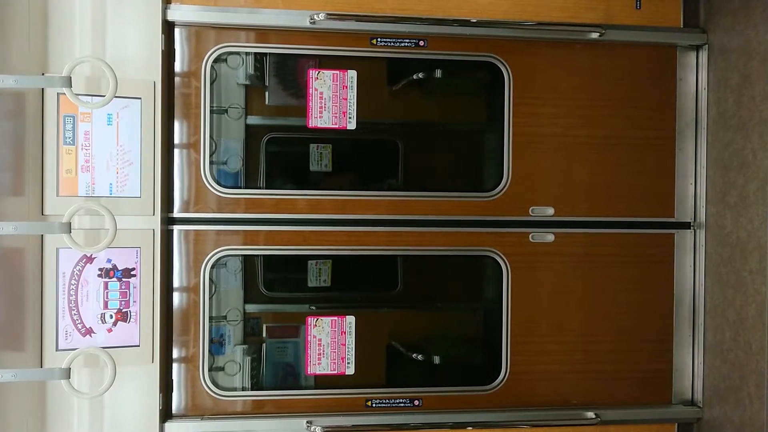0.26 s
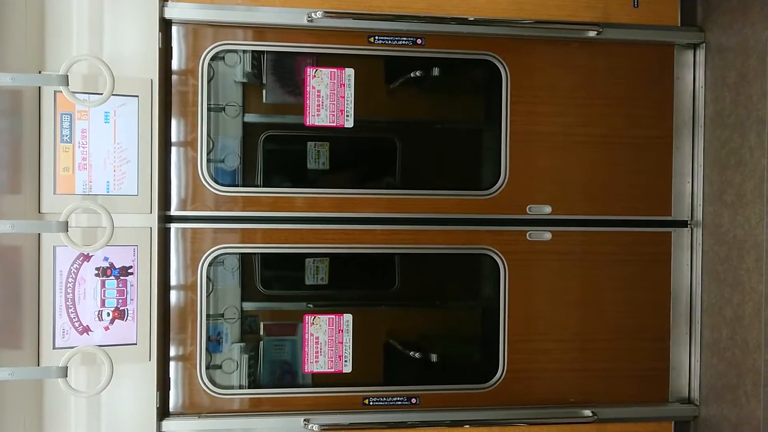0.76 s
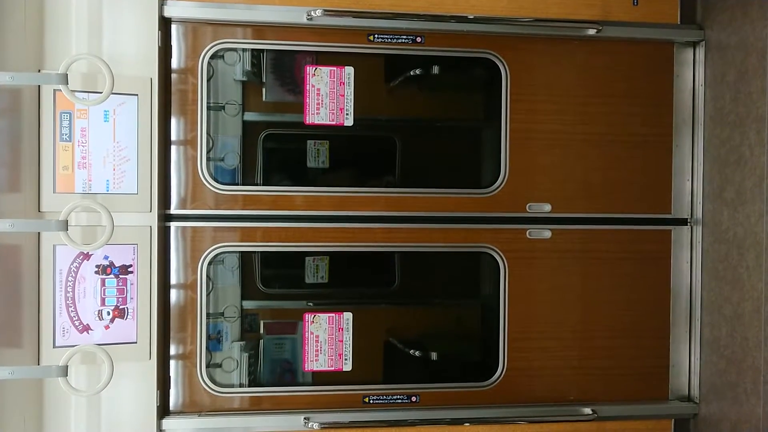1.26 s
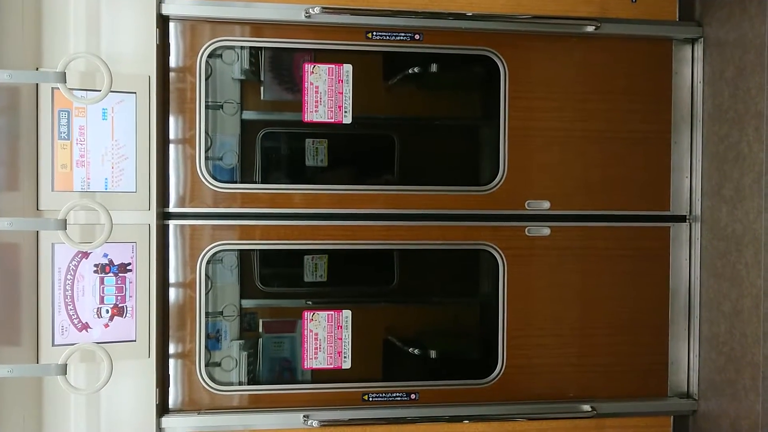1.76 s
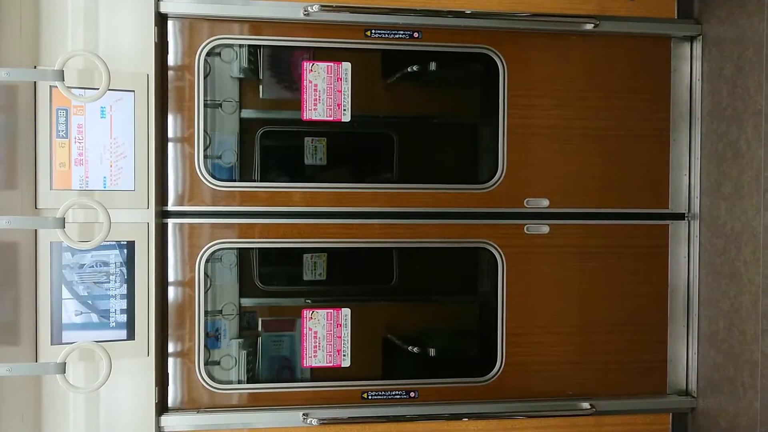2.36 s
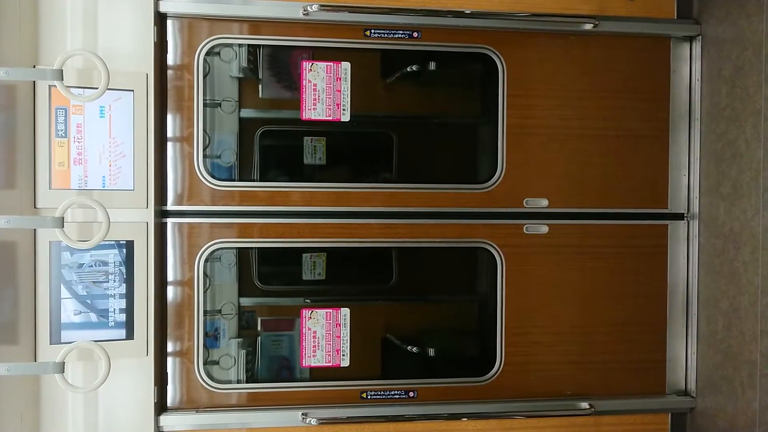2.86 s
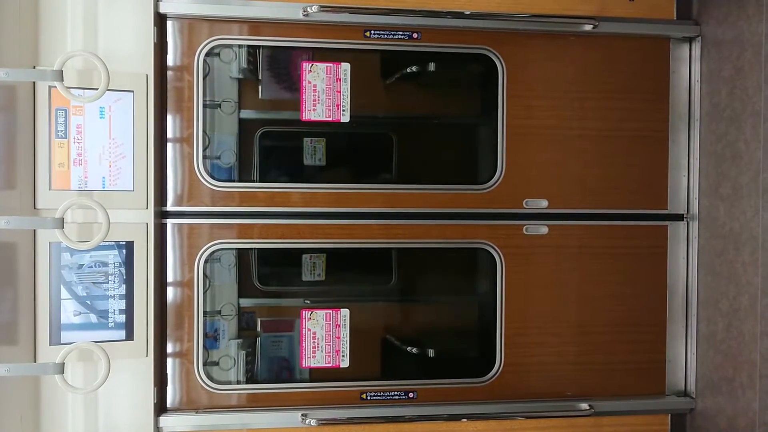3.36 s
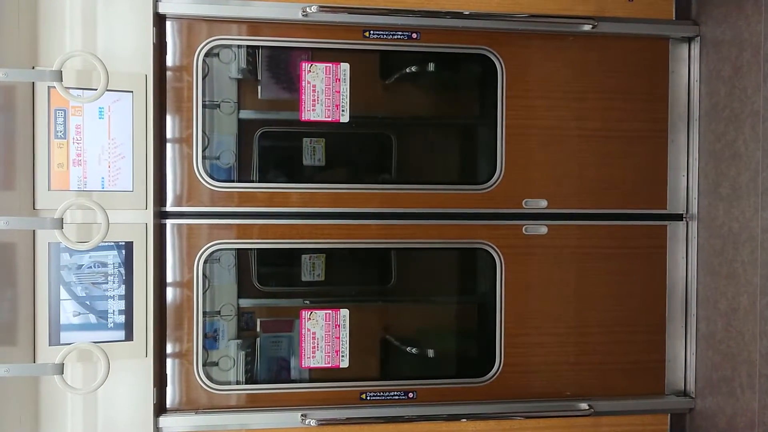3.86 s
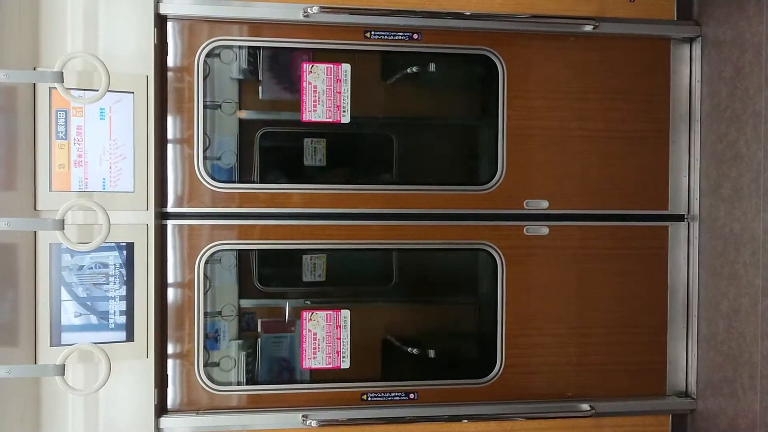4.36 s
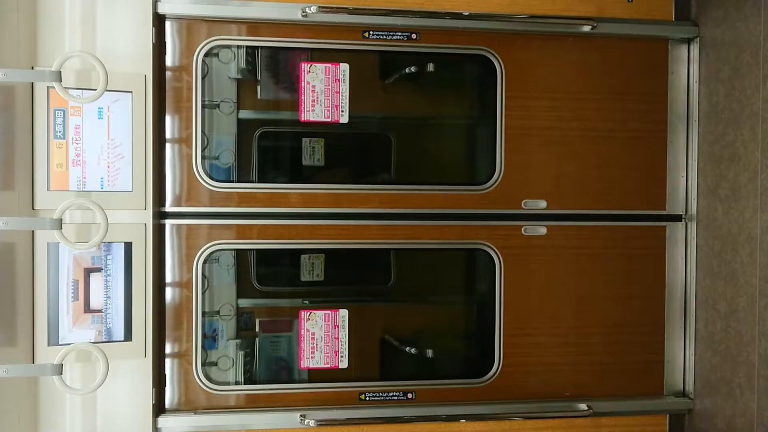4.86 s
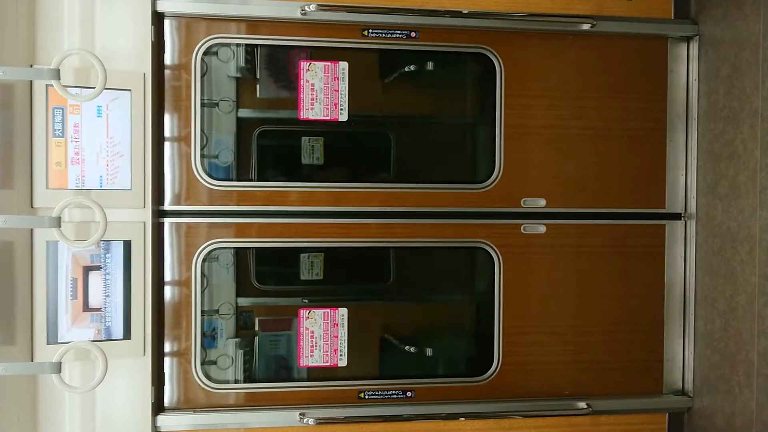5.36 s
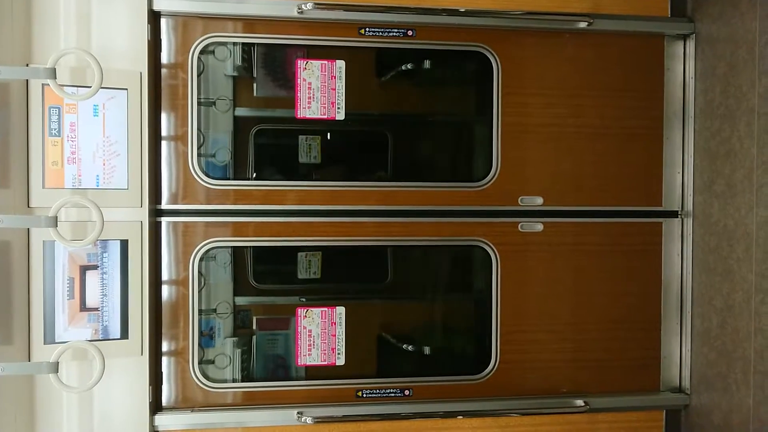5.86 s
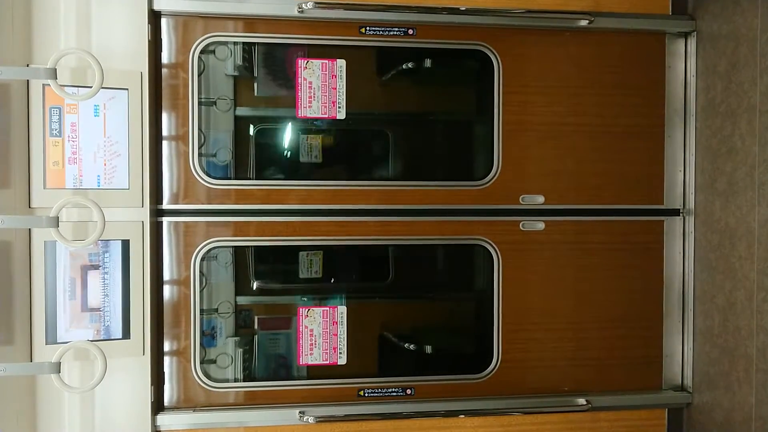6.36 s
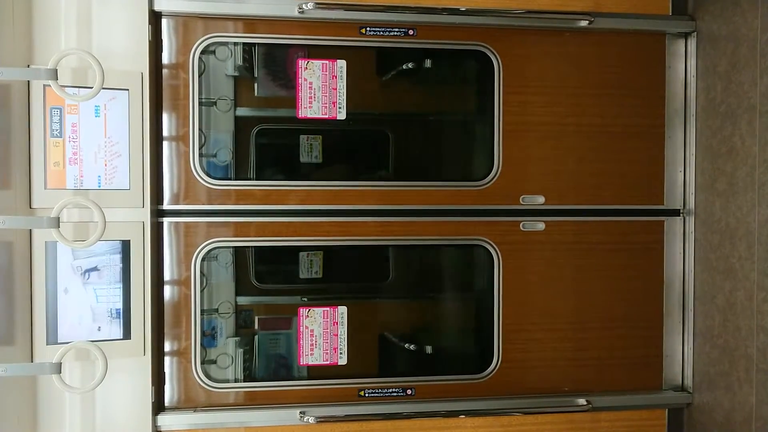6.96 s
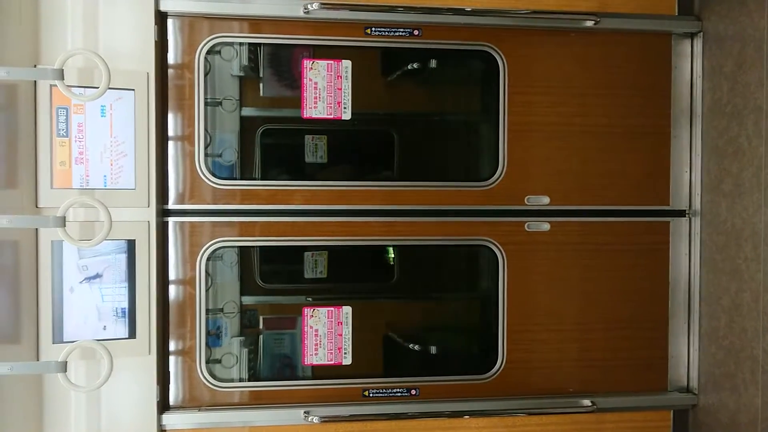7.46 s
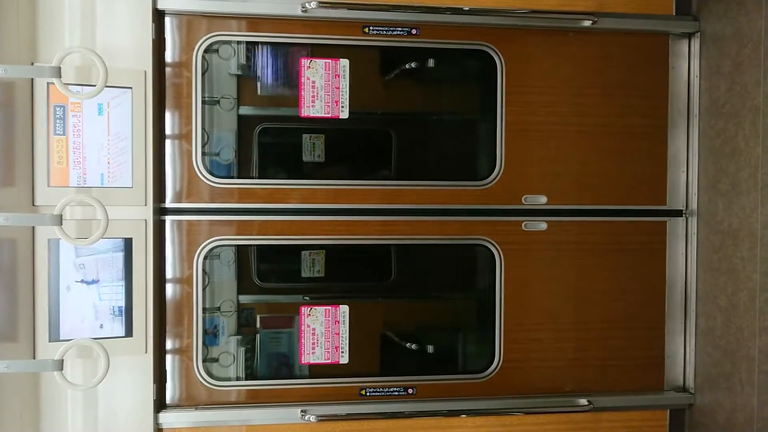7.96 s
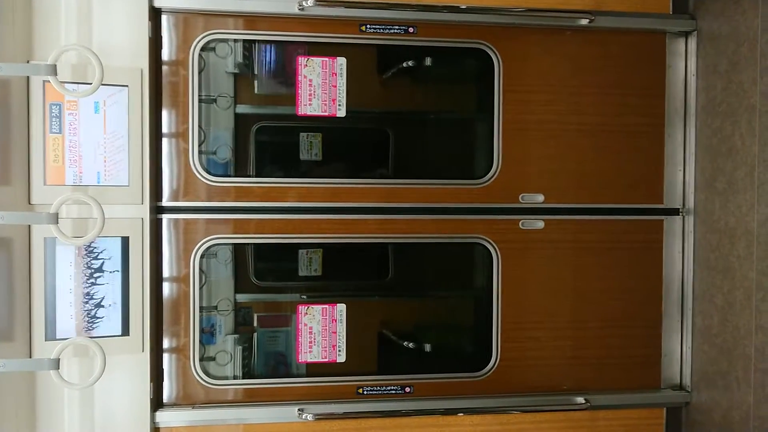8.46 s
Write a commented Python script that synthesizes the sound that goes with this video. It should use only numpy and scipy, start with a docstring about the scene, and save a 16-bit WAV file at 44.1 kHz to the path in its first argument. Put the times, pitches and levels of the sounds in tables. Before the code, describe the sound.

Inside a train car, a deep boom near 60 Hz, floor drone, midrange roar and soft hiss run continuously in wide stereo. A wheel thump lands at the start; a faint fuzzy brake whine sinks from about 1020 to 920 Hz, fading by 1.9 s amid a gentle hiss swell. Knocks with short, rattling metallic tails come at 0.8-1.0, 1.3-1.5 and 1.8-1.9 s; a tick and fitting buzz join near 1.7. The roar dips from 2 to 4 s, with knocks at 2.8-3.5 and a sharp tick at 3.2. Faint wheel ringing follows the whine. Strong, crowded knocks fill 4-6.4 s, with heavy lurches at 4.3 and 6.1. Roar surges around 5.2 and again after 6. Thin right-side crackle and sizzle swell from 5.6 to 7.4, then thin out. A left-leaning tick and softer knocks come around 8, with a weak last knock at 8.6.

```python
"""The car body booms over the roar, floor drone and hiss of a running train, heard from inside a car.
These are shaped noise beds that follow the rail roughness; boom and drone also follow the rail joints.
Wheels knock over the joints, mostly in pairs: decaying sines thump and a noise burst clatters.
A fuzzy resonant brake whine sinks and fades at the start; then the wheels ring faintly as noise resonances.
Noise ticks, sine lurches and buzzing fittings come singly; late on, faint dense snaps crackle at right
over a fine sizzle."""
import sys
import numpy as np
from scipy import signal
from scipy.fft import rfft, irfft, next_fast_len
from scipy.io import wavfile
from scipy.ndimage import uniform_filter1d

SR = 44100
rng = np.random.default_rng(int(sys.argv[2]) if len(sys.argv) > 2 else 0)


def to_wav(s):
    """Save 16-bit WAV."""
    ch = np.atleast_2d(s).T  # columns
    pcm = np.round(np.clip(ch, -1, 1) * 32767)  # PCM
    wavfile.write(sys.argv[1], SR, pcm.astype(np.int16))


N = 383669


def gain_of(db):
    """Turns decibels into an amplitude factor."""
    return 10 ** (np.asarray(db) / 20)


def evened(x):
    """Scales to rms 1."""
    return x / np.sqrt(np.mean(x ** 2) + 1e-20)


def read(points, hz):
    """Reads a table on a log-frequency axis."""
    f, value = np.transpose(points)
    return np.interp(np.log(hz + 1), np.log(f + 1), value)


def follow(rows):
    """Draws the columns of a curve table sample by sample."""
    s, *columns = np.transpose(rows)
    return [np.interp(np.arange(N) / SR, s, column) for column in columns]


def add(mix, s, sound):
    """Mixes a stereo sound in at time s, which may lie before the start."""
    at = round(s * SR)
    sound = sound[:, max(-at, 0):]
    part = mix[:, max(at, 0):][:, :sound.shape[1]]
    part += sound[:, :part.shape[1]]


def colour(x, shape):
    """Filters by a spectrum table."""
    size = next_fast_len(x.shape[-1])
    gains = gain_of(read(shape, np.fft.rfftfreq(size, 1 / SR)))
    return irfft(rfft(x, size) * gains, size)[..., :x.shape[-1]]


# likeness of left and right: f/Hz, correlation
LIKENESS = [(60, 0.99), (110, 0.98), (220, 0.96), (410, 0.73), (790, 0.53), (1500, 0.093), (2860, -0.1),
            (5440, 0.085)]
# stereo lean: f/Hz, left over right level/dB
STEREO_LEAN = [(60, 2), (110, 2), (270, -2), (730, 1), (1210, -2), (2000, -3), (3300, -6), (5400, 5),
               (8500, 8.5), (12000, -3.5)]
LEFT_LEAD_S = 0.00016  # the left microphone hears the car first


def diffuse(size):
    """Spectrum of a diffuse field at two microphones: alike in the bass, unrelated in the treble."""
    hz = np.fft.rfftfreq(size, 1 / SR)
    left, other = rfft(rng.standard_normal((2, size)))
    same = np.clip(read(LIKENESS, hz), -1, 1)
    right = same * left + np.sqrt(1 - same ** 2) * other
    right = right * np.exp(-2j * np.pi * hz * LEFT_LEAD_S)
    lean = gain_of(read(STEREO_LEAN, hz) / 2)
    return hz, np.array([left * lean, right / lean])


def wash(shape):
    """Diffuse noise of a given spectrum, rms 1."""
    size = next_fast_len(N)
    hz, z = diffuse(size)
    return evened(irfft(z * gain_of(read(shape, hz)), size)[:, :N])


def steadied(x, span_s):
    """Evens out swells slower than span_s, bringing the level close to rms 1."""
    size = max(int(span_s * SR), 2)
    power = uniform_filter1d(uniform_filter1d((x ** 2).mean(0), size), size)
    return x / np.sqrt(abs(power) + 1e-9)


def resonate(x, hz, width):
    """A steep two-pole resonance that follows the pitch hz, rms 1."""
    turn = np.exp(2j * np.pi * np.cumsum(hz * np.ones(N)) / SR)
    r = np.exp(-np.pi * width * np.sqrt(2) / SR)
    # shift the pitch down to zero, low-pass, shift back up
    around_zero = signal.lfilter([1], [1, -2 * r, r * r], x / turn)
    return evened((turn * around_zero).real)


def waver(top_hz=9):
    """Slow irregular wavering from 2 Hz to top_hz, rms 1."""
    t = np.arange(0, N, 2 ** 8) / SR
    slow = sum(np.sin(2 * np.pi * (f * t + rng.random())) for f in np.geomspace(2, top_hz, 20))
    return evened(np.interp(np.arange(N) / SR, t, slow))


# single wheels over rail joints, before the trims in joints():
# t/s, thump level/dB, middle clang level/dB, high clatter level/dB
WHEEL_BLOWS = [(-0.015, -14.5, -34, -44.5), (0.79, -16, -33.5, -48), (0.96, -20.5, -36, -48.5),
               (1.308, -24, -40, -50.5), (1.481, -27, -46, -55), (1.776, -20.5, -39.5, -52),
               (1.941, -19, -35.5, -50), (2.804, -19, -39.5, -53), (2.981, -20.5, -39.5, -54),
               (3.131, -24, -36, -45.5), (3.295, -20.5, -32.5, -46), (3.519, -29, -54, -61),
               (3.989, -16.5, -31.5, -42), (4.155, -13, -29, -40.5), (4.334, -23.5, -35.5, -48.5),
               (4.713, -25.5, -43, -51.5), (4.816, -19.5, -43.5, -48), (4.978, -19, -36.5, -50),
               (5.031, -14, -29.5, -42.5), (5.211, -16, -32.5, -43.5), (5.577, -22, -37, -47.5),
               (5.761, -25.5, -42, -52), (5.865, -18, -37.5, -51), (6.052, -19.5, -39.5, -53),
               (6.41, -26.5, -46, -58), (7.91, -25.5, -46.5, -59), (8.092, -27, -43.5, -58),
               (8.629, -31, -47, -61)]
SHAKE_RISE_S, SHAKE_T60_S = 0.035, 1.38


def shaking():
    """Each wheel's thump feeds the car body, which swings up quickly and settles slowly."""
    power, t = np.zeros(N), np.arange(N) / SR
    for s, thump_db, _, _ in WHEEL_BLOWS:
        age = np.maximum(t - s, 0)
        swing = (1 - np.exp(-age / SHAKE_RISE_S)) * gain_of(thump_db - 60 * age / SHAKE_T60_S)
        power += swing ** 2
    return np.sqrt(power)


# rail roughness under the wheels: t/s, level/dB
ROUGHNESS = [(0, 0), (1.8, -3), (2.25, -5.5), (3.9, -6), (4.7, -0.5), (5.15, 5), (5.55, -4), (6.05, 6.5),
             (6.55, 3), (7.2, 6.5), (7.8, 1.5), (8.3, 0.5), (8.7, 4)]
# spectra of the four running beds: f/Hz, relative level/dB
BOOM_SPECTRUM = [(12, -42), (24, -64), (33, -56), (45, -1), (55, -9.5), (62, 8), (69, 0.5), (90, -8),
                 (107, 0.5), (122, -6.5), (160, -26), (260, -41), (1000, -110)]
DRONE_SPECTRUM = [(30, -76), (80, -24), (135, -1.5), (185, 3.5), (225, -0.5), (290, -1), (350, -8),
                  (440, -9), (700, -60), (3000, -100)]
ROAR_SPECTRUM = [(60, -49), (230, 4), (400, 4.5), (540, 4), (650, -1.5), (880, -0.5), (1100, -6),
                 (1500, -13), (2500, -77), (8000, -91)]
HISS_SPECTRUM = [(600, 9.5), (1300, 7), (1530, 3), (2000, 8.5), (2550, 1), (3200, 2), (3800, 2.5),
                 (4400, -3.5), (5400, -5.5), (6400, -21), (7500, -15.5), (9500, -23), (11000, -15.5),
                 (11800, -42), (15000, -37)]
# response to the track: level/dB at 0 dB roughness, gain per roughness (dB/dB), shaking over thump level/dB
BOOM_RESPONSE = (-32.5, 0.26, -10.5)
DRONE_RESPONSE = (-41, 0.46, -19.5)
ROAR_DB, HISS_DB, HISS_PER_DB = -46.5, -52, 0.21  # at 0 dB roughness; dB per dB of roughness


def running(uneven_db=1.04, sway_db=1.5):
    """Rough rails roar and hiss; they and the joints make the car body boom and the floor drone."""
    rough_db, = follow(ROUGHNESS)
    shake = shaking()

    def level(response):
        """Adds the powers of rolling and joint shaking."""
        db, slope, shake_db = response
        return np.hypot(gain_of(db + slope * rough_db), gain_of(shake_db) * shake)

    boom = level(BOOM_RESPONSE) * gain_of(sway_db * waver()) * steadied(wash(BOOM_SPECTRUM), span_s=0.17)
    drone = level(DRONE_RESPONSE) * steadied(wash(DRONE_SPECTRUM), span_s=0.14)
    roar = gain_of(ROAR_DB + rough_db + uneven_db * waver()) * wash(ROAR_SPECTRUM)
    hiss = gain_of(HISS_DB + HISS_PER_DB * rough_db) * wash(HISS_SPECTRUM)
    return boom + drone + roar + hiss


# brake tones: pitch ratio, width/Hz, relative level/dB
BRAKE_TONES = [(1.0, 21.7, 0.5), (1.311, 24, -8.5)]
# hiss around the whine: f/Hz, relative level/dB
WHINE_HISS_SPECTRUM = [(600, 7.5), (1200, 13), (1800, -5), (2500, 5.5), (3500, 5.5), (4400, -6.5),
                       (5400, -6), (6400, -14.5), (11000, -16.5), (12500, -31), (15000, -35)]
WHINE_FROM_HZ, WHINE_TO_HZ, WHINE_SINK_S = 1020, 917, 0.74  # the pitch sinks ever more slowly
WHINE_SAG_DB_PER_S, WHINE_END_S, WHINE_RELEASE_S = 3, 1.94, 0.64
WHINE_HISS_DB, WHINE_HISS_PEAK_S, WHINE_HISS_SPREAD_S = -49.5, 0.79, 0.91


def whine(level_db=-47, high_db=-57, high_ratio=2.41, high_width_hz=52):
    """Fuzzy brake tones sink and fade as the train slows; a high tone and a hiss swell and ebb."""
    t = np.arange(N) / SR
    hz = WHINE_TO_HZ + (WHINE_FROM_HZ - WHINE_TO_HZ) * np.exp(-t / WHINE_SINK_S)
    release = np.clip((WHINE_END_S - t) / WHINE_RELEASE_S, 0, 1)
    level = gain_of(level_db - WHINE_SAG_DB_PER_S * t) * release
    swell = np.exp(-((t - WHINE_HISS_PEAK_S) / WHINE_HISS_SPREAD_S) ** 2)
    noise = irfft(diffuse(N)[1], N)
    main = sum(gain_of(db) * steadied(resonate(noise, hz * ratio, width), span_s=0.022)
               for ratio, width, db in BRAKE_TONES)
    high = gain_of(high_db) * steadied(resonate(noise, hz * high_ratio, high_width_hz), span_s=0.044)
    hiss = gain_of(WHINE_HISS_DB) * wash(WHINE_HISS_SPECTRUM)
    return level * main + swell * (high + hiss)


# floor and bogie modes that a blow rings: f/Hz, relative level/dB, t60/s
BOGIE_MODES = [(118, -12, 0.21), (139.7, -9.5, 0.31), (187.1, 5.5, 0.23), (247.2, -0.5, 0.47),
               (276.6, 4.5, 0.12), (308, -9.5, 0.058), (330.6, -3, 0.28), (440, -10, 0.048)]


def thump(t, bounce_s=0.014, bounce=0.59, touch=0.68):
    """The wheel clips the rail end, lands on it and bounces; each blow rings the bogie. Peak 1."""
    out = np.zeros(len(t))
    for k, strength in enumerate([touch, 1, bounce, bounce ** 2]):
        age = np.maximum(t - k * bounce_s * rng.uniform(0.7504, 1.25), 0)
        for hz, db, t60 in BOGIE_MODES:
            amplitude = strength * rng.choice([-1, 1]) * gain_of(db - 60 * age / t60)
            out += amplitude * np.sin(2 * np.pi * hz * rng.uniform(0.97, 1.02) * age)
    return out / abs(out).max()


def chatter(t, gap_s=0.0204, depth=0.26, surge_s=0.0022, contact_s=0.00085, count=4):
    """The wheel lands within a short contact time and strikes again a few times: surges in the knock."""
    strikes_s = gap_s * np.cumsum(rng.uniform(0.62, 1.36, count))[:, None]
    ages = np.maximum(t - strikes_s, 0) / surge_s
    surges = ages ** 2 * np.exp(-ages) * 2 / np.sqrt(1 + np.arange(count))[:, None]
    landing = 1 - np.exp(-(t / contact_s) ** 2)
    return landing * (1 + depth * surges.sum(0))


# knock spectrum before the zone trims: f/Hz, relative level/dB
KNOCK_SPECTRUM = [(50, -14), (90, 0.5), (140, -2), (200, -0.5), (330, -4), (620, -18), (900, -18.5),
                  (1500, -26), (2600, -30), (3300, -28), (4200, -31.5), (5300, -36), (6500, -46),
                  (10500, -49), (13000, -61), (15000, -96)]
# build-up of the knock: f/Hz, time constant/s
KNOCK_BUILD_UP = [(150, 0.0031), (400, 0.017), (1000, 0.005), (3000, 0.024), (9000, 0.07)]
# decay of the knock after its hold: f/Hz, t60/s
KNOCK_DECAY = [(100, 1), (300, 0.51), (900, 0.49), (3000, 0.68), (9000, 0.5)]
# wall and door resonances: f/Hz, width/Hz, lift level/dB
PANEL_MODES = [(700, 60, 0), (859, 21, 4.5), (1415, 31, 2.5), (2220, 340, 3.5), (2890, 110, 4.5)]


def clatter(t, levels_db, hold_s=0.043, direct=0.3):
    """Part of the knock arrives at once; the rest builds up in panels and cabin and dies away."""
    hz, z = diffuse(len(t))
    ringing_db = sum(db / (1 + (2 * (hz - f) / width) ** 2) for f, width, db in PANEL_MODES)
    shape = gain_of(read(KNOCK_SPECTRUM, hz) + ringing_db)
    # each blow has its own strength in the low, middle and high zone
    trims = []
    for (lo, hi), db in zip([(150, 450), (500, 1500), (2000, 6000)], levels_db):
        own_db = 10 * np.log10(np.sum(shape[(hz > lo) & (hz < hi)] ** 2) / len(hz))
        trims.append((np.sqrt(lo * hi), db - own_db))
    z = z * shape * gain_of(read(trims, hz))
    # overlapping octave bands build up and die away at their own pace
    centres = np.geomspace(100, 12800, 8)
    out = np.zeros((2, len(t)))
    for centre, share in zip(centres, np.eye(len(centres))):
        band = irfft(z * np.interp(np.log(hz + 1), np.log(centres), share), len(t))
        rise = 1 - (1 - direct) * np.exp(-t / read(KNOCK_BUILD_UP, centre))
        decay = gain_of(-60 * np.maximum(t - hold_s, 0) / read(KNOCK_DECAY, centre))
        out += band * rise * decay
    return out


def joints(body_db=-12.0, clang_db=-0.5, clatter_db=3.5):
    """Every wheel that crosses a joint gives a thump and its clatter."""
    out, t = np.zeros((2, N)), np.arange(2 ** 15) / SR
    for s, low, mid, high in WHEEL_BLOWS:
        zone_levels_db = (low + body_db, mid + clang_db, high + clatter_db)
        knock = chatter(t) * clatter(t, zone_levels_db)
        add(out, s, gain_of(low) * thump(t) + knock)
    return out


# single ticks: t/s, peak level/dB, left over right level/dB
TICK_EVENTS = [(0.2848, -55, 6), (1.6214, -48, 7), (1.7355, -41, 7), (3.2114, -36, 3.5), (3.7814, -51, 2.5),
               (7.912, -36, 10)]
# tick spectrum: f/Hz, relative level/dB
TICK_SPECTRUM = [(2000, -14), (4700, 8), (8000, 1), (11000, -4), (15000, -4)]


def ticks(decay_s=0.0011):
    """Small dry ticks close to the microphones: coloured noise that dies within milliseconds."""
    out, t = np.zeros((2, N)), np.arange(2 ** 10) / SR
    for s, db, pan in TICK_EVENTS:
        tick = colour(rng.standard_normal((2, len(t))), TICK_SPECTRUM) * np.exp(-t / decay_s)
        sides = gain_of([[pan / 2], [-pan / 2]])
        add(out, s, gain_of(db) * sides / sides.mean() * tick / abs(tick).max())
    return out


# the car body drops on its springs: t/s, level/dB
BODY_DROPS = [(1.312, -25), (3.3, -24), (4.336, -16.5), (6.075, -11)]
LURCH_HZ, LURCH_T60_S = 61.4, 1


def lurch(rise_s=0.024):
    """A heavy jolt sets the lowest mode of the car body booming, as a decaying sine."""
    out, t = np.zeros((2, N)), np.arange(SR) / SR
    sides = gain_of(read(STEREO_LEAN, LURCH_HZ) * np.array([[0.5], [-0.5]]))
    for s, db in BODY_DROPS:
        envelope = (1 - np.exp(-t / rise_s)) * gain_of(db - 60 * t / LURCH_T60_S)
        add(out, s, sides * envelope * np.sin(2 * np.pi * LURCH_HZ * t))
    return out


# loose fittings: t/s, f/Hz, width/Hz, level/dB
LOOSE_FITTINGS = [(1.732, 4150, 706, -47.5), (7.178, 5200, 900, -58)]


def rattles(rise_s=0.0026, t60_s=0.14):
    """Loose metal fittings buzz for a moment: resonant noise with a quick rise and decay."""
    out, t = np.zeros((2, N)), np.arange(2 ** 13) / SR
    for s, hz, width, db in LOOSE_FITTINGS:
        buzz = resonate(rng.standard_normal((2, N)), hz, width)[:, :len(t)]
        add(out, s, buzz * (1 - np.exp(-t / rise_s)) * gain_of(db - 60 * t / t60_s))
    return out


# resonances of the rolling wheels: f/Hz, width/Hz, level/dB at 0 dB roughness
WHEEL_MODES = [(855, 30, -67.5), (1683, 72, -60), (2277, 154, -61), (2866, 140, -64)]
WHEEL_SWELL_S, WHEEL_PER_DB = 0.63, 0.23  # rise once the whine has ended; dB per dB of roughness


def wheel_ring():
    """Rolling keeps the wheels singing softly, more so on rough rails."""
    rough_db, = follow(ROUGHNESS)
    swell = np.clip((np.arange(N) / SR - WHINE_END_S) / WHEEL_SWELL_S, 0, 1)
    noise = irfft(diffuse(N)[1], N)
    ring = sum(gain_of(db) * resonate(noise, hz, width) for hz, width, db in WHEEL_MODES)
    return swell * gain_of(WHEEL_PER_DB * rough_db) * ring


# spells of crackle: start t/s, length t/s, snaps per s at the height
CRACKLE_SPELLS = [(5.55, 0.83, 130), (6.5, 0.92, 130), (7.5, 1, 7)]
# snap and sizzle spectrum: f/Hz, relative level/dB
SNAP_SPECTRUM = [(4000, -22), (7000, -2), (9000, 10), (11000, 3), (14000, 6), (15500, -14)]


def crackle(level_db=-51, spread_db=14, sizzle_db=-52, decay_s=0.0003):
    """Faint, thin snaps of uneven size over a fine sizzle on the right, in spells that swell and ebb."""
    t = np.arange(N) / SR
    rate = sum(top * np.sin(np.pi * np.clip((t - s) / length, 0, 1)) for s, length, top in CRACKLE_SPELLS)
    chance = rate / SR  # of a snap at each sample
    sizes = (rng.random(N) < chance) * gain_of(level_db - spread_db * rng.random(N))
    snaps = signal.lfilter([1], [1, -np.exp(-1 / (decay_s * SR))], sizes)
    sizzle = gain_of(sizzle_db) * np.sqrt(abs(chance))
    right = colour((snaps + sizzle) * rng.standard_normal(N), SNAP_SPECTRUM)
    return np.array([np.zeros(N), right])


def scene():
    """Everything heard inside the car."""
    return running() + whine() + joints() + ticks() + lurch() + rattles() + wheel_ring() + crackle()


def record(dry, edge_hz=15100):
    """The recorder's band limit: a steep low-pass."""
    low_pass = signal.firwin(511, edge_hz, window=("kaiser", 9), fs=SR)
    return signal.oaconvolve(dry, low_pass[None], "same")


dry = scene()
out = record(dry)
to_wav(out)
```